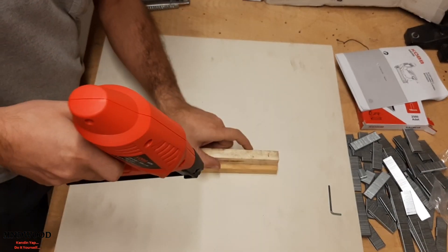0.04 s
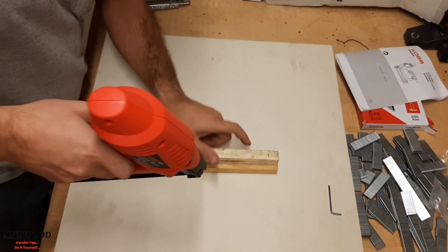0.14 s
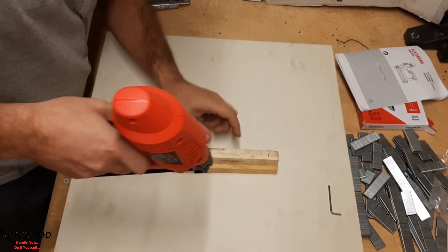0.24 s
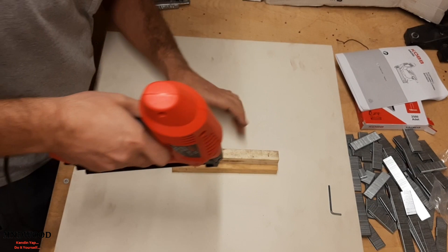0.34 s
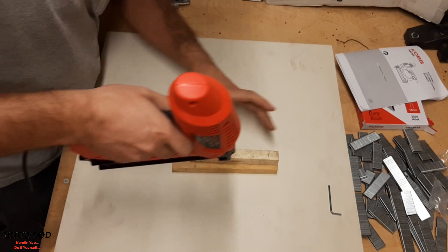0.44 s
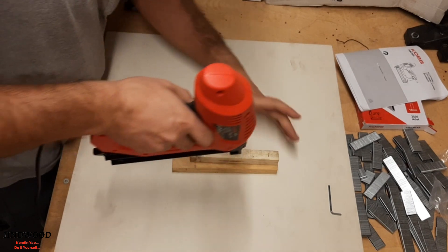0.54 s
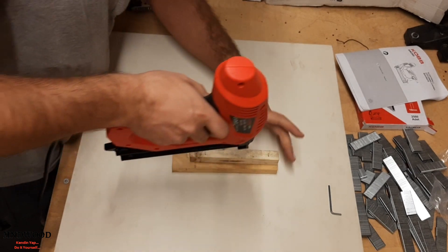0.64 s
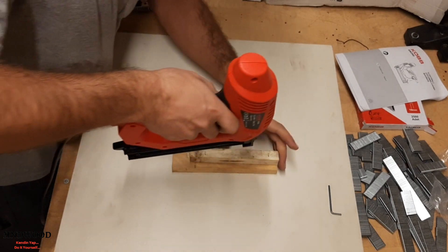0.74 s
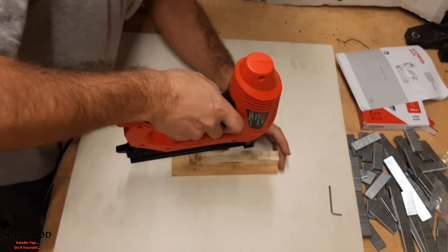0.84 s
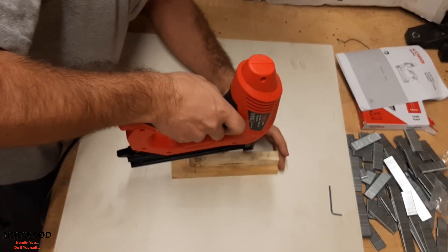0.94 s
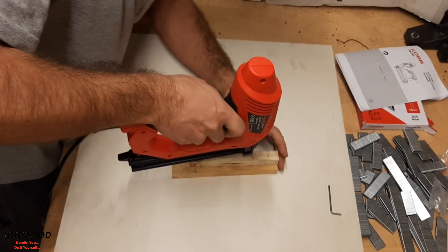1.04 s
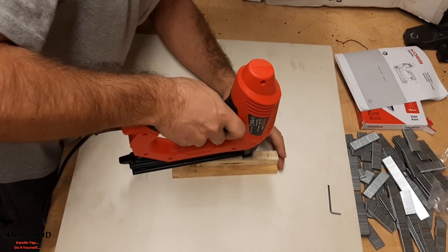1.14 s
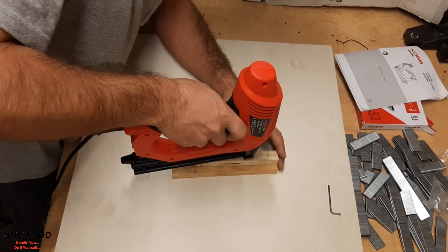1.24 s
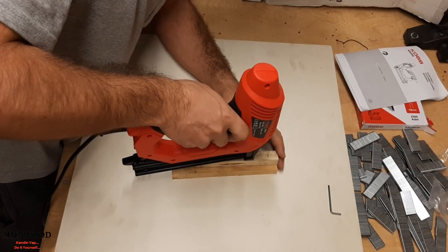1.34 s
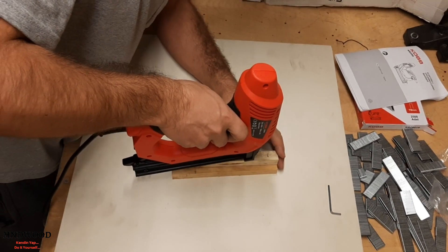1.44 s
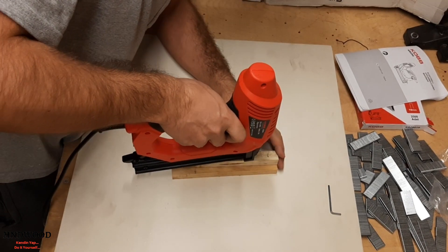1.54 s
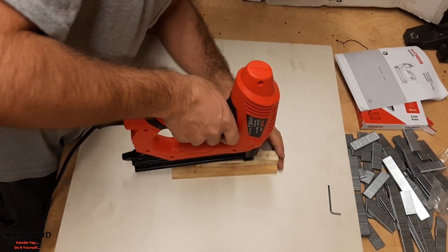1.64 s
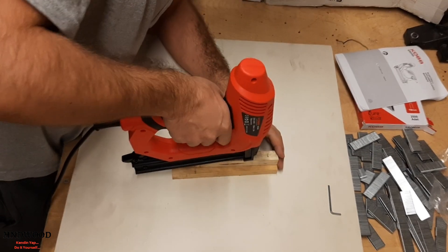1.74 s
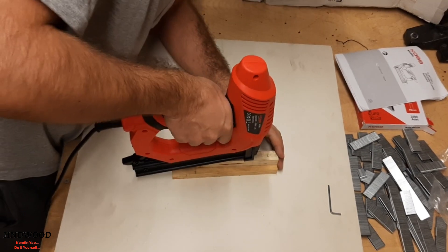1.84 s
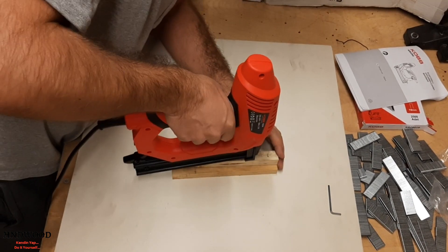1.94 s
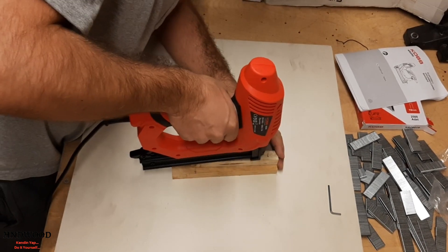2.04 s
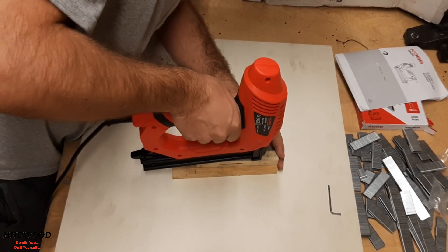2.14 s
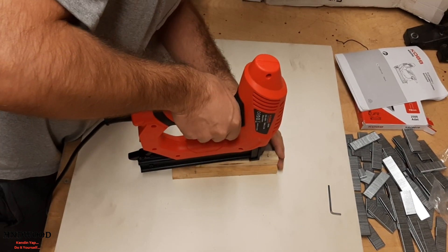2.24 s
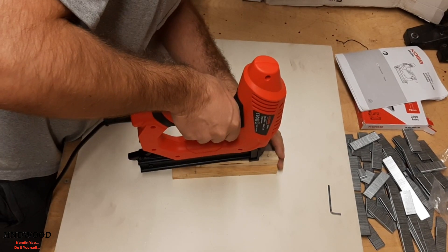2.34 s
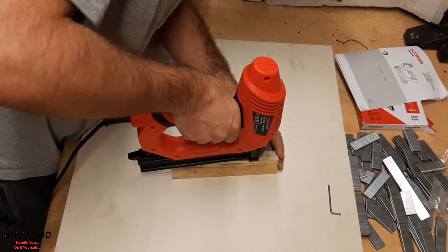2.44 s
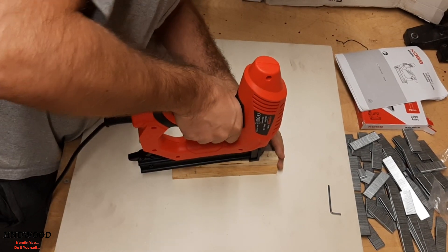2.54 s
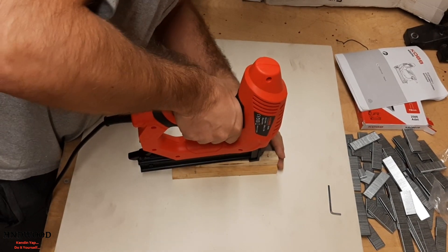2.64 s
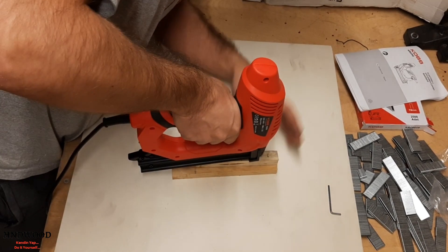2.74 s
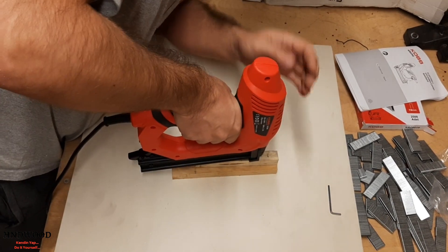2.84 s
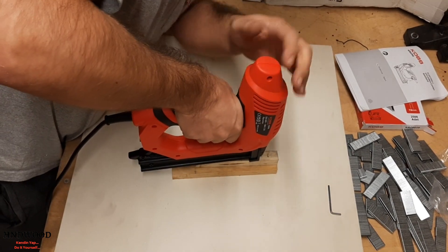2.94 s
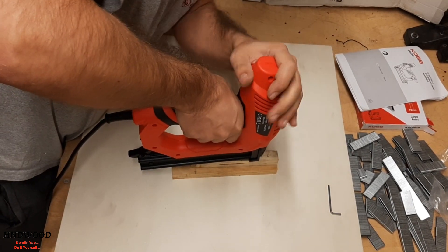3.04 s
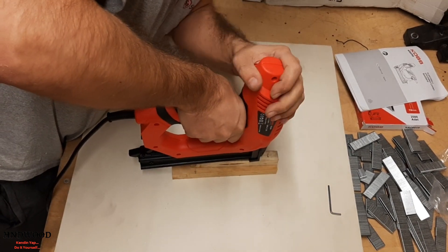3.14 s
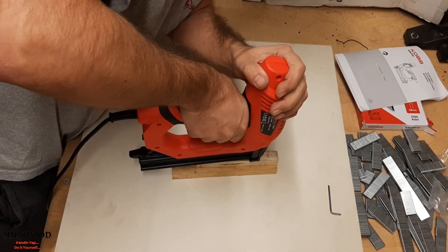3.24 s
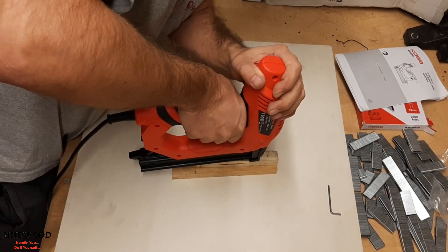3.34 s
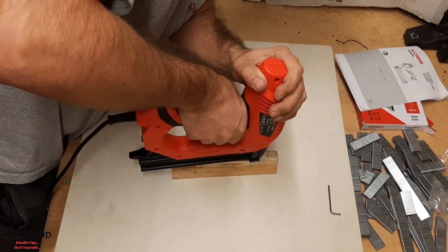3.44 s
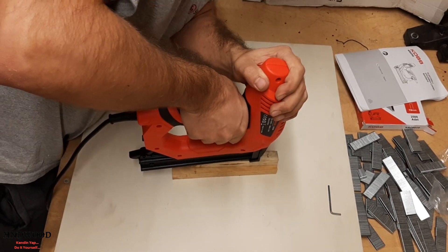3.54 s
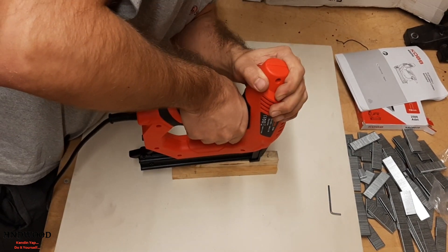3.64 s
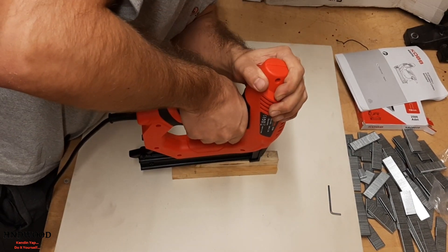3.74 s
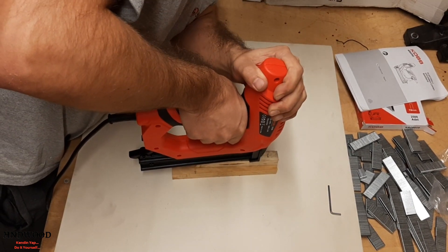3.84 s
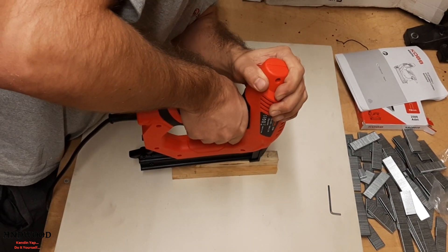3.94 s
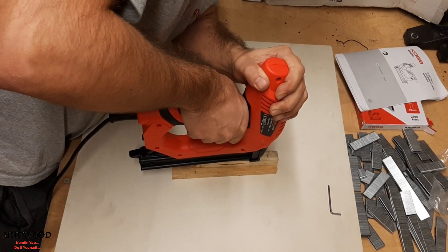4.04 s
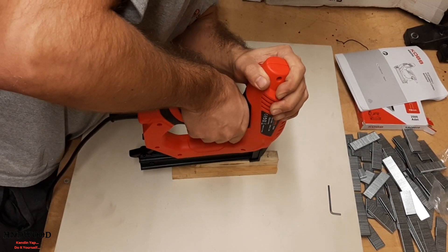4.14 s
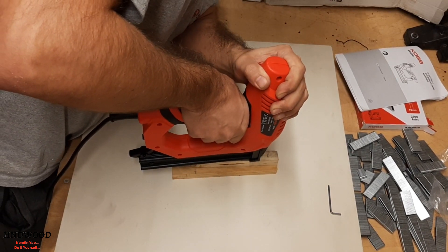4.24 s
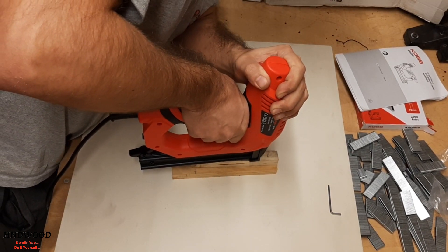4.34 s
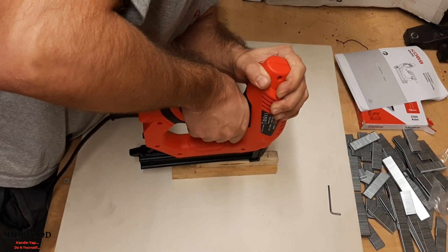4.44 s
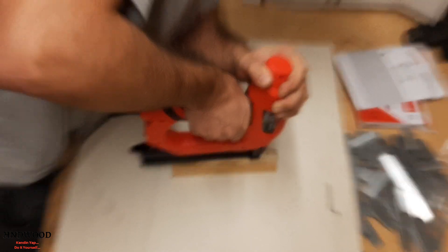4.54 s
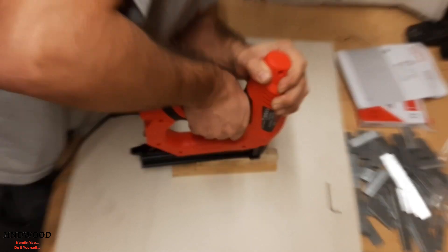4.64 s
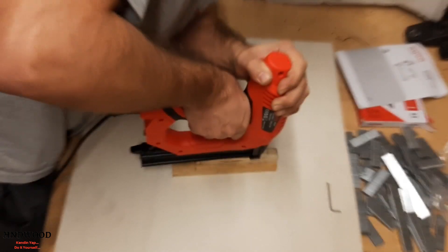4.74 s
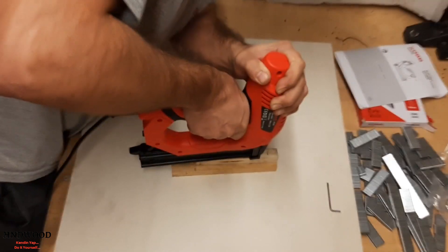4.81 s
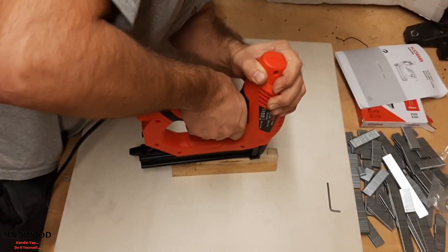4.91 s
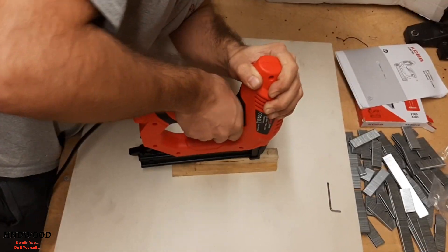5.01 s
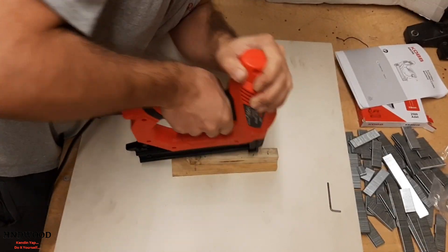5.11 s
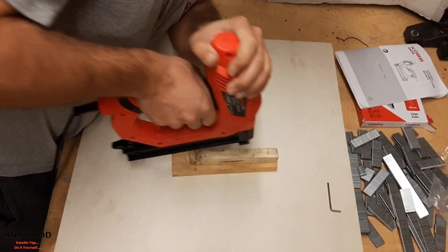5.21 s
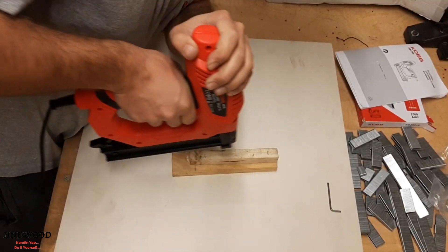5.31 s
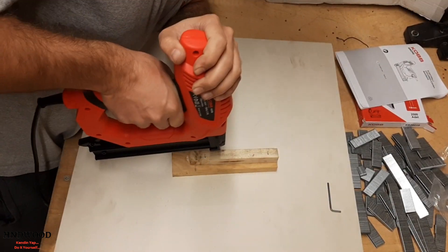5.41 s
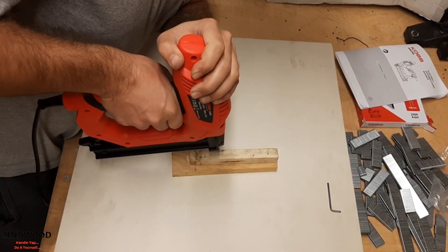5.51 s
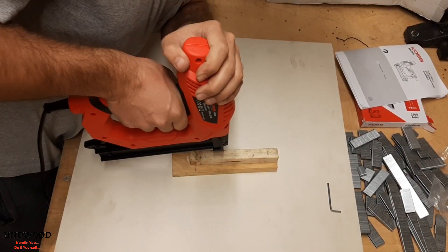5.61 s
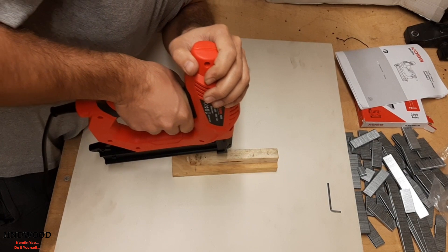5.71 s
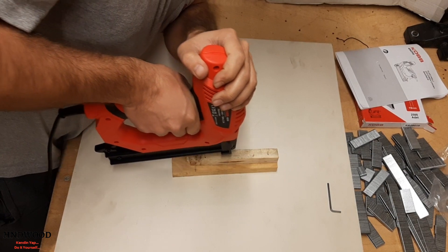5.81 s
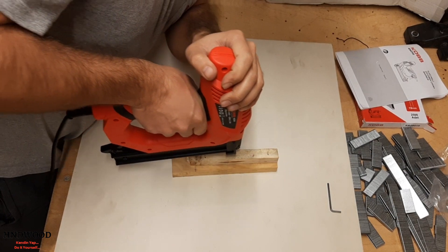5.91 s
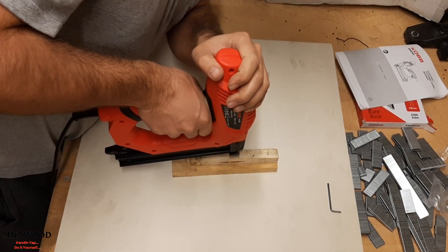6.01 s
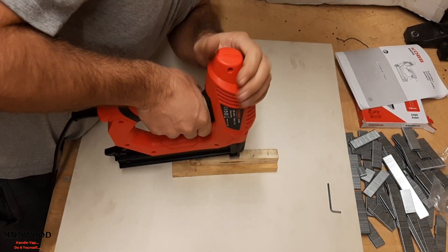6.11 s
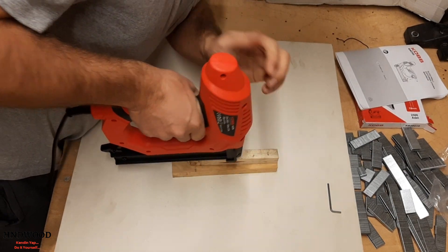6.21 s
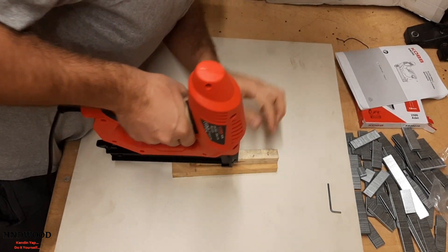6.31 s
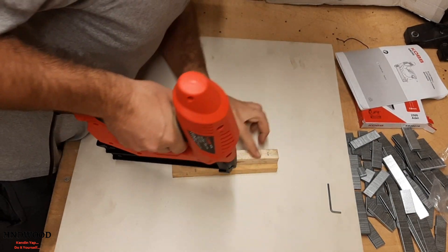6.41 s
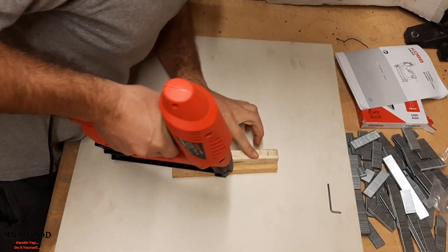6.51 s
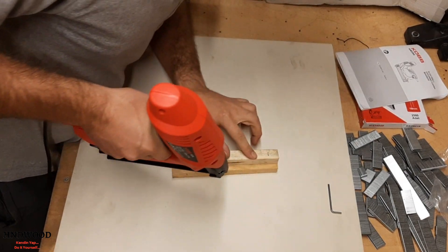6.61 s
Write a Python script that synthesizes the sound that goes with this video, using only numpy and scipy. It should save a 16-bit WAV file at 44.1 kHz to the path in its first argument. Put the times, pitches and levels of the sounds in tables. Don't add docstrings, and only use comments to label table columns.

```python
import sys
import numpy as np
from scipy import signal
from scipy.io import wavfile
from scipy.ndimage import uniform_filter1d

SR = 44100
rng = np.random.default_rng(int(sys.argv[2]) if len(sys.argv) > 2 else 0)


def makeup_ratio(level_db):
    decades = np.asarray(level_db, float) / 20
    return 10 ** decades


def digitize_waveform(pressure):
    field = np.atleast_2d(pressure).T
    bounded = np.clip(field, -1, 1)
    quanta = np.round(bounded * 32767).astype(np.int16)
    wavfile.write(sys.argv[1], SR, quanta)


N = 294044
T = np.arange(N) / SR

# [t/s, wood level/dB, hardness/dB, metal click level/dB, chatter/s]
SHOT_CONTACTS = [(4.5136, -56.5, 8, -37.5, 0.0041), (4.5885, -40.5, 2, -40, 0.0061),
                 (4.5929, -31.5, 5, -19.5, 0.0089), (4.598, -16.5, 6, -20.5, 0.00045),
                 (4.6015, -9.5, -5.5, -29, 0.0029), (4.608, -17.5, 5.5, -36, 0.0019),
                 (4.63, -22, 1.5, -18.5, 0.013), (4.636, -19, -5.5, -22.5, 0.0017),
                 (4.645, -17.5, -18, -30, 0.025), (4.65, -17.5, -3, -31, 0.00066),
                 (4.7944, -51.5, 5, -40, 0.0042), (4.804, -48, 7, -56, 0.0015),
                 (5.122, -91, 20, -62, 0.0033)]
# [t/s, level/dB]
BLOW = [
    (4.598, -8),
]
# [f/Hz, level/dB, t60/s]
BLADE_MODES = [
    (12700, -45, .16),
]
# [t/s, level/dB]
SPRING_LEVEL = [
    (4.8, -68),
    (4.815, -47),
    (4.89, -49.5),
    (4.95, -53.5),
    (5.0, -74),
]
# [t/s, level/dB, hardness (high over low modes)/dB]
HANDLING_KNOCKS = [(0.003, -30.5, -7), (0.439, -30.5, -12), (0.461, -34.5, -9.5), (1.057, -52.5, -25),
                   (1.097, -46, -29), (1.443, -51, -11.5), (1.467, -42, -12), (1.589, -63, -5.5),
                   (1.8, -33.5, -28), (2.066, -55, 7), (2.104, -42.5, 1.5), (2.116, -30.5, -24),
                   (2.136, -40, -37), (2.269, -54.5, -14), (2.399, -63.5, -1.5), (6.5, -44, -34),
                   (6.558, -52.5, -30)]
# [t/s, level/dB]
HANDLING_THUMPS = [(0.003, -58), (1.442, -44), (1.466, -42), (1.59, -43.5), (1.802, -28.5), (2.104, -56),
                   (2.114, -29.5), (2.134, -25.5), (2.271, -49), (2.418, -34), (2.508, -44), (6.494, -51.5),
                   (6.56, -63)]
# [t/s, level/dB]
HANDLING_TICKS = [(0.003, -39.5), (0.437, -64), (1.467, -63), (1.663, -66.5), (2.064, -57), (2.092, -68),
                  (2.1047, -43), (2.115, -59), (3.081, -65)]
# [f/Hz, density/(dB per Hz)]
CLICK_SPECTRUM = [(710, -39), (1200, -14), (1530, -4.5), (1860, -14), (2010, -10), (3290, -12),
                  (5700, -11.5), (6360, -12.5), (7330, -15), (9030, -30), (14800, -13), (16000, -28.5),
                  (16500, -60.5)]
# [f/Hz, level/dB, t60/s]
BENCH_MODES = [(77.6, 5, 0.62), (57.37, -20.5, 1), (88.6, -10, 1), (113.8, -7, 0.81), (130.93, -5.5, 0.52),
               (160, -16, 0.81), (205.7, -5.5, 0.59)]
# [f/Hz, level/dB, t60/s]
BLOCK_MODES = [(243.1, -15.5, .2), (284, -15, 0.15), (306.5, -2, 0.33), (337, -9, .2), (418, -1.5, 0.1),
               (465, -6, 0.26), (499.8, -3, .25), (555.9, 2, 0.3), (608.7, -1, 0.049), (636, -8, .15),
               (694.4, -15, 0.11), (904.2, -6, 0.11), (1007, -1, 0.15), (1057, 2.5, .1), (1226, -3, 0.078),
               (1262, -1.5, .12), (1329, -4.5, .1), (1534, 7.5, 0.12), (1700, -8.5, .1), (1830, -9, 0.049),
               (2040, -5.5, .12), (2300, -15, .08), (2837, -10, 0.24), (3067, -8, 0.036),
               (3700, -13.5, 0.094)]
# [t/s, level/dB, chatter/s]
FINGER_TAPS = [
    (6.4985, -50.5, 0.0054),
    (6.504, -59, 0.015),
    (6.52, -70, 0.013),
]
# [f/Hz, level/dB, t60/s]
FREE_BLOCK_MODES = [(560, 4, 0.08), (663, 1.5, 0.051), (912, 3, 0.037), (1105, -0.5, 0.035),
                    (1254, -1.5, 0.049), (1569, 2.5, 0.05), (1743, -14, .04)]
# [t/s, hold/s, wood drag level/dB, skin and plastic rustle level/dB]
STROKES = [(0.0, 0.01, -35.5, -54.5), (.385, 0.057, -71.5, -95), (0.836, .098, -51.5, -78.5),
           (1.48, .003, -62, -97), (1.66, 0.13, -80, -80), (1.812, 0.0033, -55.5, -79),
           (2.024, 0.076, -63, -75.5), (2.118, 0.0027, -51.5, -64), (2.29, 0.0038, -67.5, -76),
           (2.75, .003, -73, -79), (3.108, 0.024, -80, -64), (3.18, 0.096, -93, -88),
           (4.82, .003, -48.5, -59.5), (4.852, 0.13, -54.5, -64.5), (5.128, 0.017, -61.5, -72.5),
           (6.152, .022, -89, -70.5), (6.485, .01, -71, -89), (6.53, 0.0037, -52, -87)]
# [f/Hz, width/Hz, level/dB]
DRAG_MODES = [(281, 43, -16.5), (583, 87, -3.5), (937, 37, -8), (1130, 40, -11), (1523, 34, -11.5),
              (2180, 230, -11)]
# [f/Hz, density/(dB per Hz)]
RUSTLE_SPECTRUM = [(1060, -38), (1800, -11), (2050, -14), (3000, -4), (4200, 1.5), (7290, -1), (8060, -24),
                   (8440, -36), (11700, -9.5), (16000, -15)]
# [start t/s, end t/s, f/Hz, width/Hz, level/dB]
SQUEAK_BANDS = [(0.827, 0.984, 5600, 304, -81), (1.732, 1.935, 3570, 400, -82),
                (2.01, 2.112, 3560, 400, -78.5), (2.038, 2.11, 11900, 676, -71.5),
                (2.24, 2.33, 11840, 596, -78), (2.245, 2.324, 3450, 400, -83),
                (4.854, 4.942, 4370, 412, -61.5), (4.908, 5.04, 2910, 259, -64),
                (4.94, 5.05, 2388, 160, -65), (4.94, 5.051, 3700, 200, -68), (5.122, 5.22, 6320, 250, -73),
                (5.123, 5.175, 7340, 302, -61), (1.638, 1.723, 2300, 400, -81),
                (6.158, 6.192, 2897, 405, -65.5)]
# [f/Hz, t60/s]
ROOM_DECAY = [(100, .5), (300, 0.55), (1000, 0.19), (4000, .32), (8000, 0.24), (15000, 0.22)]
# [t/s, level/dB]
LEAN_LEVEL = [(0.0, -53), (0.1, -65), (.7, -68.5), (1.04, -65), (1.38, -66.5), (1.78, -59.5), (2.56, -65),
              (2.79, -64.5), (3.02, -65.5), (3.2, -56), (3.45, -64.5), (4.17, -61), (5.24, -54.5),
              (5.47, -69), (5.82, -69.5), (5.91, -60), (6.19, -65.5), (6.67, -61)]
# [f/Hz, density/(dB per Hz)]
RUMBLE_SPECTRUM = [(12, -51.5), (20, -30), (37, -9), (60, 4.5), (86, -17.5), (125, -7), (176, -25.5),
                   (213, -17), (244, -31), (315, -24.5), (362, -38.5), (408, -32), (460, -39.5), (626, -42),
                   (1200, -51), (1560, -82), (2640, -120)]
# [f/Hz, density/(dB per Hz)]
HISS_SPECTRUM = [(410, -38), (700, -4.5), (767, -0.5), (875, -2.5), (1480, 1.5), (1690, -4.5), (2030, -6),
                 (4770, -11.5), (8620, -19.5), (15000, -1.5), (16200, -14.5)]
# [f/Hz, likeness/1]
STEREO_LIKENESS = [(60, 1), (150, 0.87), (380, 1), (950, -0.98), (2380, -0.28), (5980, 0.19),
                   (15000, -0.017)]
# [t/s, hold/s, level/dB, octave level/dB, f/Hz]
FAN_WHINE = [
    (4.26, .12, -74, -81.5, 471.8),
    (5.5, 0.54, -77.5, -110, 444),
]

LOW_MODES = 10
PRESSED_S, PRESSED_TOP_HZ = 1.3, 1390
TURN_RAD_PER_DB = 0.15
REBOUND_S = 4.66
SPRING_HZ, SPRING_TAPS_PER_S = 1747, 103
KNOCK_CHATTER_S, TICK_CHATTER_S = 0.029, 0.016
RUB_RISE_DB_PER_S, RUB_FALL_DB_PER_S = 635, 348
HISS_DB = -79.5
DUCK_DB, DUCK_HOLD_S, RECOVER_DB_PER_S = 11.5, 0.69, 9
WHINE_RISE_DB_PER_S, WHINE_FALL_DB_PER_S = 89, 75
MIC_LOW_HZ, RIGHT_LEAN_DB = 48, 1.37


def shot():
    knocks = [(s, db, hard, length) for s, db, hard, click, length in SHOT_CONTACTS]
    ticks = [(s, click, length) for s, db, hard, click, length in SHOT_CONTACTS]
    return hits(knocks, BLOW, ticks, firm=0.76, held=0.79, choked=False, deep_db=3, low_db=-13,
                high_db=-14.5, crowd_db=-6.5, bench_db=1, click_db=29.0)


def hits(knocks, thumps, ticks, firm, held, choked, deep_db, low_db, high_db, crowd_db, bench_db, click_db):
    block = [(hz, db + deep_db * (hz < 320), held * min(t60, 140 / hz)) for hz, db, t60 in BLOCK_MODES]
    dull = chatter(knocks, column=1, firm=firm)
    hard_knocks = [(s, db + hard, length) for s, db, hard, length in knocks]
    sharp = chatter(hard_knocks, column=1, firm=firm)

    low_board = ring(dull, crowd(365, 800, 0.25 * held, count=25), 2.2)
    low = ring(dull, block[:LOW_MODES], 2.5) + makeup_ratio(crowd_db - 7) * low_board
    high_board = ring(sharp, crowd(750, 4600, 0.23 * held, count=60), 6.0)
    high = ring(sharp, block[LOW_MODES:], 1.9) + makeup_ratio(crowd_db) * high_board
    high = np.where(choked, band(high, 820, PRESSED_TOP_HZ), band(high, 700, 3800))
    wood = makeup_ratio(low_db) * band(low, 240, 1100) + makeup_ratio(high_db) * high

    push = np.zeros(N)
    push[[round(s * SR) for s, db in thumps]] = makeup_ratio([db for s, db in thumps])
    bench_modes = [(hz, db, held * t60) for hz, db, t60 in BENCH_MODES]
    bench = ring(soften(push, contact_s=0.002), bench_modes, 0.45)

    click = np.array([colour(chatter(ticks, column=1, firm=0.34), CLICK_SPECTRUM) * makeup_ratio(db)
                      for db in (-3.5, 0)])
    return wood + makeup_ratio(bench_db) * band(bench, 65, 600) + makeup_ratio(click_db) * click


def driver():
    return ring(chatter([(REBOUND_S, 0, 0.015)], column=1, firm=0.38), BLADE_MODES, 1.5)


def spring():
    wobble = 0.035 * evened(uniform_filter1d(rng.standard_normal(N), size=3000))
    turns = np.maximum.accumulate(np.floor(T * SPRING_TAPS_PER_S + 0.82 + wobble))
    uneven = makeup_ratio(0.73 * rng.standard_normal(N))
    taps = np.diff(turns, prepend=0) * curve(SPRING_LEVEL, column=1) * uneven
    return band(ring(taps, [(SPRING_HZ, 9, 0.009)], 1.5), 1500, 2050)


def handling():
    knocks = [(*row, KNOCK_CHATTER_S) for row in HANDLING_KNOCKS]
    ticks = [(*row, TICK_CHATTER_S) for row in HANDLING_TICKS]
    return hits(knocks, HANDLING_THUMPS, ticks, firm=0.49, held=0.53, choked=T > PRESSED_S, deep_db=12,
                low_db=-21, high_db=-17.0, crowd_db=-11.5, bench_db=-4.5, click_db=15)


def tap():
    return band(ring(chatter(FINGER_TAPS, column=1, firm=0.94), FREE_BLOCK_MODES, 5.0), 507, 1510)


def rubs():
    drag = swells(STROKES, 2, RUB_RISE_DB_PER_S, RUB_FALL_DB_PER_S)
    rustle = swells(STROKES, 3, RUB_RISE_DB_PER_S, RUB_FALL_DB_PER_S)
    drag, rustle = uniform_filter1d(drag, size=300), uniform_filter1d(rustle, size=300)
    slip_size = rng.standard_normal(N) * makeup_ratio(0.25 * rng.exponential(1, N))
    slips = slip_size * (rng.random(N) < 0.15)
    modes = [(hz, db + 20 * np.log10(width) / 2, 1.4 / width) for hz, width, db in DRAG_MODES]
    wood = band(evened(ring(slips, modes, 10.8)), 242, 1690)
    return makeup_ratio(-5.0) * drag * wood + makeup_ratio(-1.0) * rustle * noise(RUSTLE_SPECTRUM, size=256, patchy_db=2.0)


def squeaks():
    out = np.zeros((2, N))
    for start, end, hz, width, db in SQUEAK_BANDS:
        gate = np.clip(np.minimum((T - start) / 0.0042, (end - T) / 0.059), 0, 1) ** 2
        edges_hz = [hz - width / 2, hz + width / 2]
        resonance = signal.butter(2, edges_hz, "bandpass", fs=SR, output="sos")
        out += makeup_ratio(db) * gate * evened(signal.sosfilt(resonance, rng.standard_normal((2, N))))
    return out


def room(x):
    taps = np.zeros((2, SR))
    at = np.arange(200, SR - 20, 20) + rng.integers(0, 20, (2, (SR - 201) // 20))
    np.put_along_axis(taps, at, rng.choice([-1., 1.], at.shape), axis=1)
    hz, t, z = signal.stft(taps, SR, nperseg=256)
    decay = makeup_ratio(-60 * t / read(ROOM_DECAY, hz)[:, None])
    tail = signal.istft(z * decay, SR, nperseg=256)[1]
    tail = signal.lfilter(*signal.butter(2, 250, "high", fs=SR), tail)
    return signal.fftconvolve(x, tail / np.linalg.norm(tail[0]), axes=1)[:, :N]


def background():
    since = T - BLOW[0][0]
    drop_db = np.clip(DUCK_DB - RECOVER_DB_PER_S * (since - DUCK_HOLD_S), 0, DUCK_DB)
    duck = makeup_ratio((since > 0) * -drop_db)
    rumble = curve(LEAN_LEVEL, column=1) * makeup_ratio(5.0) * noise(RUMBLE_SPECTRUM, size=4096, patchy_db=2.0)
    hiss = makeup_ratio(HISS_DB) * noise(HISS_SPECTRUM, size=512, patchy_db=1.83)
    air = rng.standard_normal((2, N))
    whine = np.zeros((2, N))
    for k in (1, 2):
        for row in FAN_WHINE:
            tone = evened(ring(air[k - 1], [(k * row[-1], 0, 0.12)], 1.5))
            whine += tone * swells([row], k + 1, k * WHINE_RISE_DB_PER_S, k * WHINE_FALL_DB_PER_S)
    return duck * (rumble + hiss) + whine


def chatter(rows, column, firm):
    out, t = np.zeros(N), np.arange(2500) / SR
    for row, patter in zip(rows, rng.standard_normal((len(rows), len(t)))):
        force = patter * np.exp(-t / max(row[-1], 1e-4))
        force /= np.linalg.norm(force)
        force[0] += firm
        part = out[round(row[0] * SR):][:len(t)]
        part += makeup_ratio(row[column]) * force[:len(part)]
    return out


def soften(x, contact_s):
    r = np.exp(-1 / (contact_s * SR))
    return signal.lfilter([(1 - r) ** 2], [1, -2 * r, r ** 2], x)


def ring(x, modes, spread_db):
    t = np.arange(SR // 2) / SR
    body = np.zeros((2, len(t)))
    for (hz, db, t60), lean in zip(modes, rng.uniform(-1, 1, len(modes))):
        side_db = spread_db * lean * np.array([[1], [-1]])
        wave = np.sin(2 * np.pi * hz * t + TURN_RAD_PER_DB * side_db)
        body += makeup_ratio(db - 60 * t / t60 + side_db) * wave
    return signal.oaconvolve(x[None], body, axes=1)[:, :N]


def crowd(low_hz, high_hz, t60, count):
    hz = np.geomspace(low_hz, high_hz, count) * rng.uniform(0.97, 1.03, count)
    level_db = 4 * rng.standard_normal(count) - 4.1 * np.log2(hz / low_hz)
    return [(f, db, t60 * (low_hz / f) ** 0.2) for f, db in zip(hz, level_db)]


def band(x, low_hz, high_hz):
    return signal.sosfilt(signal.butter(3, [low_hz, high_hz], "bandpass", fs=SR, output="sos"), x)


def colour(x, points):
    level_db = np.maximum(read(points, abs(np.fft.fftfreq(4096, 1 / SR))), -90)
    taps = np.fft.ifft(np.exp(np.conj(signal.hilbert(np.log(makeup_ratio(level_db)))))).real[:1024]
    return signal.oaconvolve(x, taps / np.linalg.norm(taps))[:N]


def noise(points, size, patchy_db):
    frames, hz = 4 * N // size + 6, np.fft.rfftfreq(size, 1 / SR)
    a, b, c, d, patches = rng.standard_normal((frames, len(hz), 5)).T
    patches = evened(uniform_filter1d(uniform_filter1d(patches, size=6, axis=0), size=8, axis=1))
    same = np.clip(read(STEREO_LIKENESS, hz), -1, 1)[:, None]
    left = a + 1j * b
    right = same * left + np.sqrt(1 - same ** 2) * (c + 1j * d)
    z = np.array([left, right]) * makeup_ratio(read(points, hz)[:, None] + patchy_db * patches)
    return evened(signal.istft(z, nperseg=size, noverlap=size * 3 // 4)[1][:, :N])


def swells(rows, column, rise, fall):
    total = 0
    for row in rows:
        before_s = np.maximum(row[0] - T, 0)
        after_s = np.maximum(T - row[0] - row[1], 0)
        total = total + makeup_ratio(row[column] - rise * before_s - fall * after_s)
    return total


def curve(rows, column):
    rows = np.array(rows)
    return makeup_ratio(np.interp(T, rows[:, 0], rows[:, column], left=-200, right=-200))


def read(points, hz):
    f, value = np.transpose(points)
    return np.interp(np.log(hz + 1), np.log(f + 1), value)


def evened(x):
    return x / np.sqrt(np.mean(x ** 2) + 1e-20)


def scene():
    near = handling() + shot() + tap() + driver() + spring()
    return near + makeup_ratio(-7.5) * room(near) + rubs() + squeaks() + background()


def roll_off(x):
    return signal.sosfilt(signal.butter(12, 16820, fs=SR, output="sos"), x)


def record(dry):
    heard = signal.sosfilt(signal.butter(4, MIC_LOW_HZ, "high", fs=SR, output="sos"), dry)
    heard = heard * makeup_ratio(RIGHT_LEAN_DB * np.array([[-0.5], [0.5]]))
    return roll_off(1.225 * np.tanh(heard / 1.186))


dry = scene()
out = record(dry)
digitize_waveform(out)
```